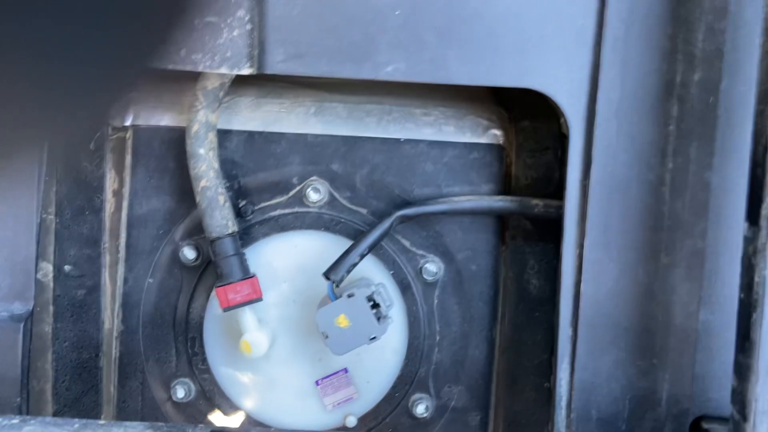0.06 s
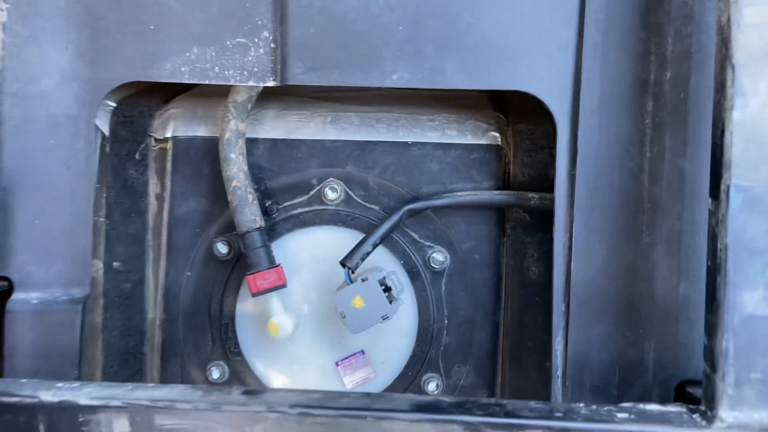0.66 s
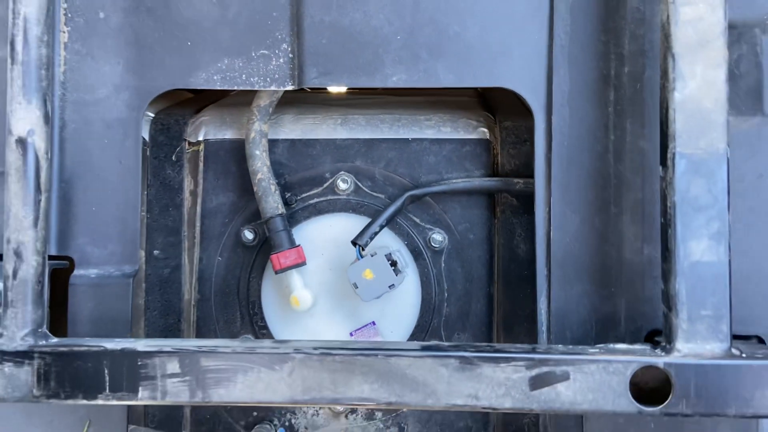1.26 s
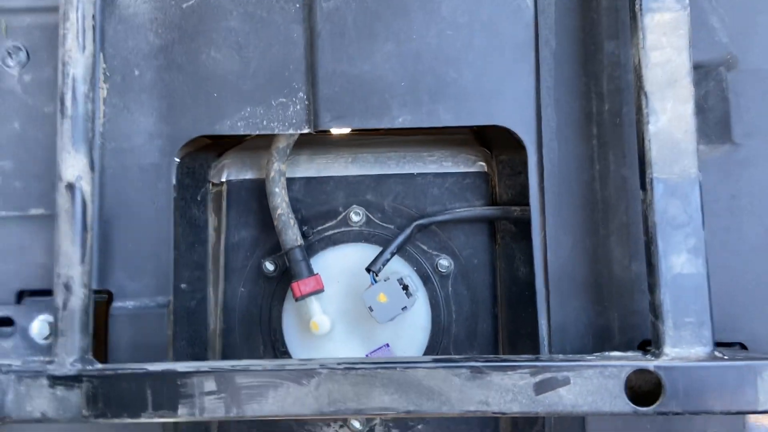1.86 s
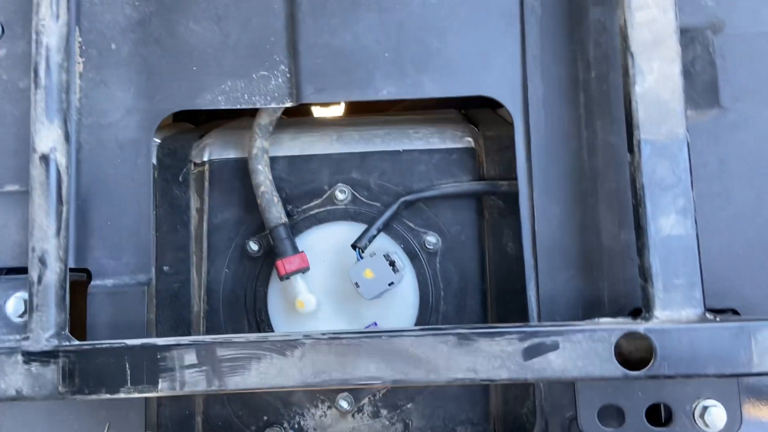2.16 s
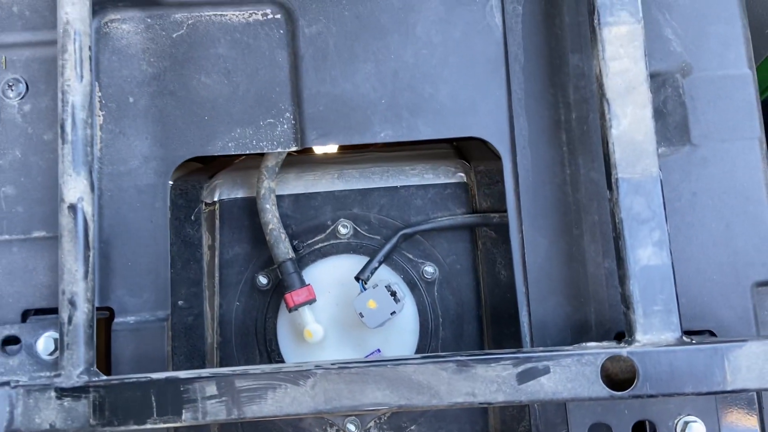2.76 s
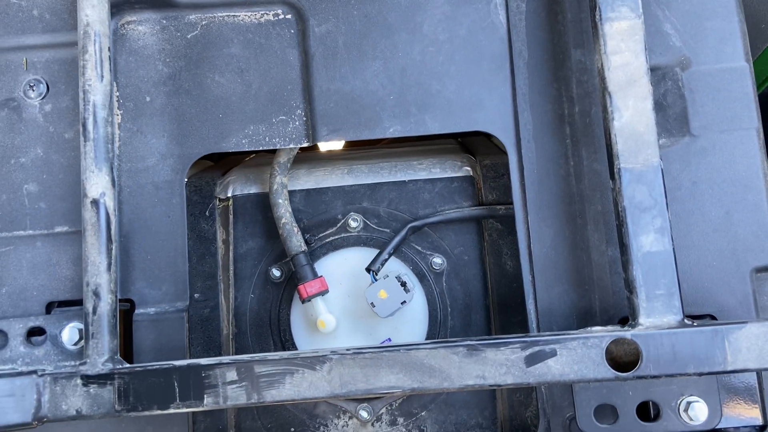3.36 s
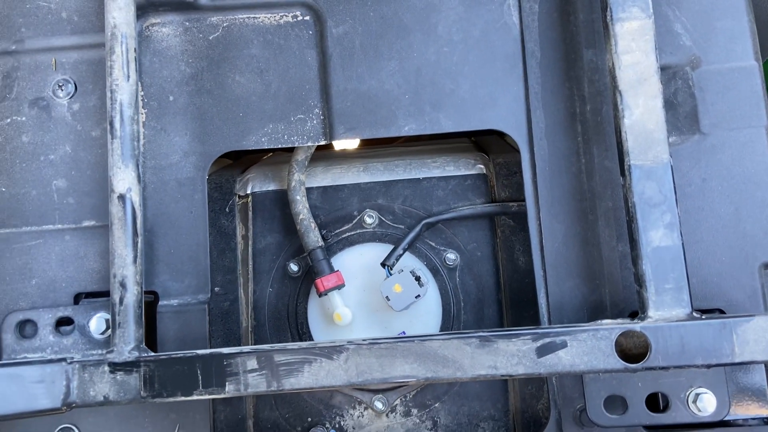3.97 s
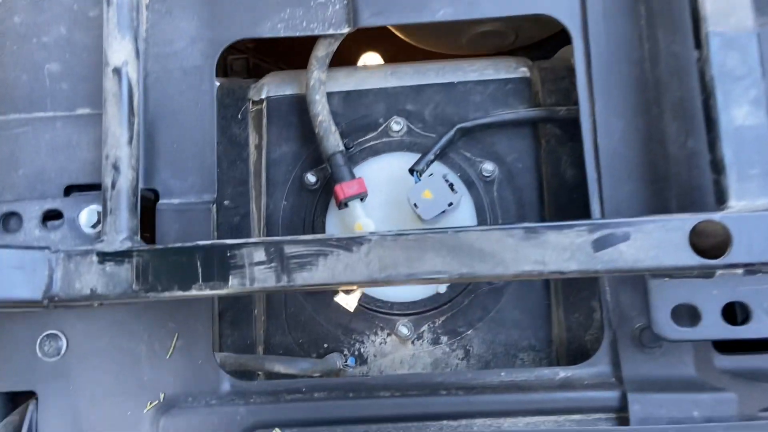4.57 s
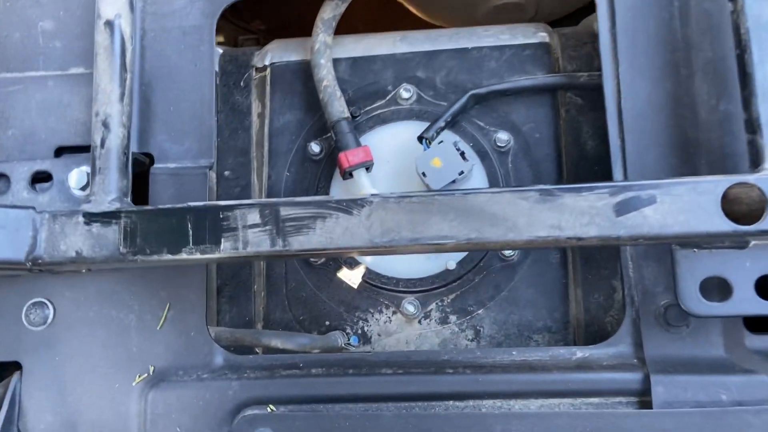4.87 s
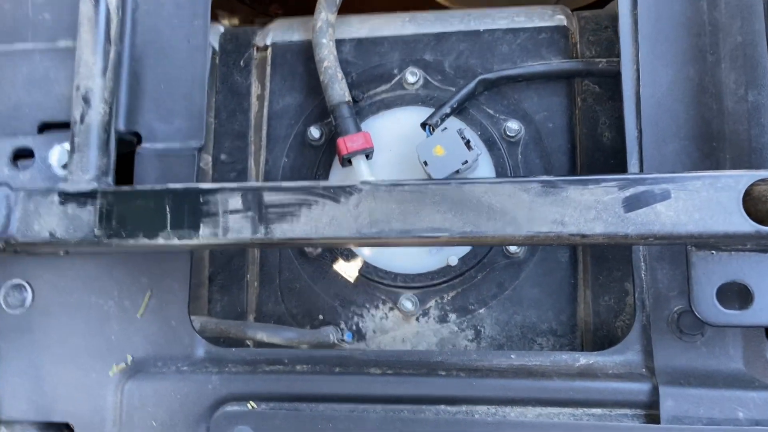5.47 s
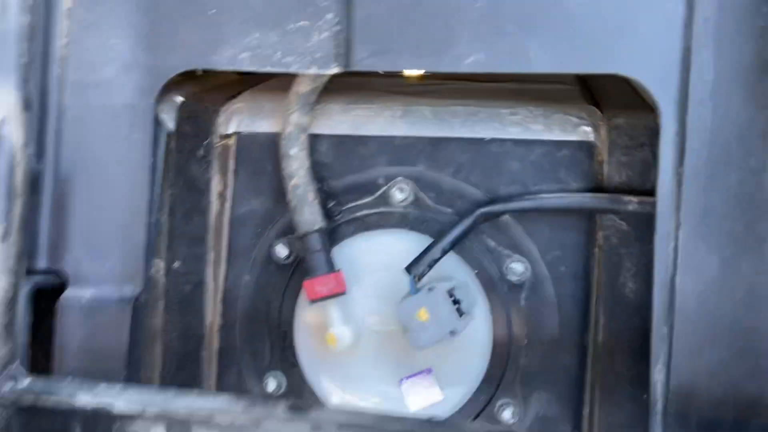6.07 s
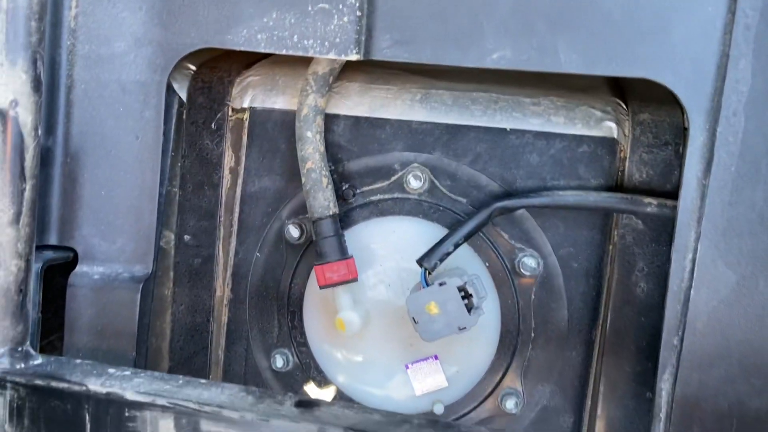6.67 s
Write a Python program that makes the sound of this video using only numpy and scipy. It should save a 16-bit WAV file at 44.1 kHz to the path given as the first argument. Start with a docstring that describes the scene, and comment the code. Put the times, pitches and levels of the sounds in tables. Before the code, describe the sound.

A twin-cylinder utility vehicle idles for the whole of nearly seven seconds, heard from just above the open hatch of its fuel tank. Deep, unevenly paired exhaust thumps dominate, with a quieter rasp of gas, a patter of valve ticks, ringing panels and a wavering mid-pitched hum. The speed hunts, sagging at about 0.6 seconds and again between 2.5 and 3.1 seconds; now and then a firing falters or a valve softly knocks. Loose metal fittings clink lightly three times between 0.6 and 1 second, then in a higher cluster from 2.6 to 3.3 seconds. A faint electric fuel pump whine grows from about 2 seconds, is strongest near 4.7, and swells again around 6.4. The hum rises briefly near 5.8 seconds. Resonances come and go as the microphone draws back through the middle and comes in again toward the end, the engine still running.

```python
"""A twin-cylinder utility vehicle idles, heard from just above the open hatch of its fuel tank.
From the start, each cycle gives two uneven thumps that boom in the silencer, a rasp of gas and a patter
of valve ticks; panels ring and a hum wavers near 490 Hz. Soon the speed hunts, a firing falters now and
then, and valves knock. Loose fittings clink, most near 3 s, as the electric fuel pump's whine grows.
Resonances come and go as the microphone draws back from the hatch and, toward the end, comes in again."""
import sys
import numpy as np
from scipy import signal
from scipy.io import wavfile
from scipy.ndimage import uniform_filter1d, minimum_filter1d

SR = 44100
rng = np.random.default_rng(int(sys.argv[2]) if len(sys.argv) > 2 else 0)


def put_to_file(sound):
    """Save the sound as 16-bit audio at rate SR, in the file named by the first command-line argument."""
    columns = np.atleast_2d(sound).T  # one column per channel
    safe = np.clip(columns, -1, 1)
    whole_steps = np.round(safe * 32767)
    wavfile.write(sys.argv[1], SR, whole_steps.astype(np.int16))


N = 296352
TIME = np.arange(N) / SR

# Stereo balance of the engine. Each row: frequency in Hz, left minus right in dB.
BALANCE = [(60, -2.5), (190, -4), (380, 7), (1250, -1), (2400, 4), (4400, 3.5), (8000, -0.5), (15000, 0)]
# Modes of the engine casing, each heard best from one spot. Each row: frequency in Hz, bandwidth in Hz,
# relative level there in dB, time of passing it in seconds, seconds to fall by 3 dB.
CASING_MODES = [(2847, 57, -47, 6.554, 0.8949), (3268, 105, -53.5, 4.998, -2.9),
                (3404, 49, -46.5, 1.51, 0.44), (3506, 63, -51, 2.7, -0.03), (3532, 55, -49.5, 6.5, 0.14),
                (3960, 66, -53.5, 0.25, 6), (4326, 79, -47, 1.5497, 0.62), (4175, 82, -50.5, 3.7, 0.47),
                (4404.4, 135, -48.5, 6.8, 1.5), (4737, 118, -52, 3.02, 2.15), (5567, 84, -53.5, 2.9, 1.22),
                (6156, 61, -55, 6.2, 4.2), (6461, 74, -54, 1.96, 2.5), (6614, 310, -53.5, 6.7, 2.25),
                (7253, 300, -53.5, 4, 6)]


def from_db(db):
    """Decibels to amplitude ratio."""
    return 10 ** (np.asarray(db) / 20)


def rms_one(x):
    """Scale to unit rms."""
    return x / np.sqrt(np.mean(x ** 2) + 1e-20)


def in_time(points, times=TIME):
    """Interpolate a curve linearly in time."""
    return np.interp(times, *np.transpose(points))


def at_hz(points, hz):
    """Interpolate a spectrum on a log-frequency axis."""
    frequencies, values = np.transpose(points)
    return np.interp(np.log(hz), np.log(frequencies), values)


def drift(corner_hz):
    """Low-passed noise: a slow random fluctuation of unit rms."""
    step, run_in = 40, 2000
    pole = np.exp(-2 * np.pi * corner_hz * step / SR)
    white = rng.standard_normal(N // step + run_in + 2)
    slow = signal.lfilter([1], [1, -2 * pole, pole * pole], white)[run_in:]
    return np.interp(np.arange(N) / step, np.arange(len(slow)), rms_one(slow))


def clicks(times, sizes, samples=N):
    """An impulse of the given size at each time."""
    at = np.round(np.maximum(times, 0) * SR).astype(int).ravel()
    return np.bincount(at, np.ravel(sizes), samples)[:samples] + 1e-18


def ring(x, hz, t60):
    """Free vibration: a unit impulse starts a damped sine of height 1."""
    r, w = from_db(-60 / (t60 * SR)), 2 * np.pi * hz / SR
    return signal.lfilter([0, np.sin(w)], [1, -2 * r * np.cos(w), r * r], x)


def fade(x, seconds):
    """Exponential decay: each impulse leaves a dying envelope of the same height."""
    return signal.lfilter([1], [1, -np.exp(-1 / (seconds * SR))], x)


def pan(x, pan_db):
    """A level difference, left minus right, places the sound."""
    return x * from_db([[pan_db / 2], [-pan_db / 2]])


def stereo(pair, hz, pan_db):
    """Partial coherence: two unrelated signals mix into left and right, most alike in the bass."""
    # Each row: frequency in Hz, left-right correlation.
    coherence = [(60, 0.986), (130, 0.954), (220, 1), (640, 0.6), (1400, 0), (2400, 0.668), (4500, 0.703),
                 (7000, 0.864), (9000, 0), (15000, 0.54)]
    alike = np.clip(at_hz(coherence, hz), -.99, .99)
    mid = np.sqrt((1 + alike) / 2) * pair[0]
    side = np.sqrt((1 - alike) / 2) * pair[1]
    return pan(np.array([mid + side, mid - side]), pan_db)


def shaken(envelope, hz, width_hz, pan_db):
    """Forced vibration: noise that follows the envelope drives one mode, scaled to about unit rms."""
    force = rng.standard_normal((2, N)) * envelope
    r, w = np.exp(-np.pi * width_hz / SR), 2 * np.pi * hz / SR
    motion = signal.lfilter(np.array([1, 0, -1]) * (1 - r * r) / 2, [1, -2 * r * np.cos(w), r * r], force)
    return stereo(rms_one(motion), hz, pan_db)


def chatter(envelope, per_s):
    """Shot noise: tiny random contacts, denser and harder where the envelope is high."""
    return (rng.random(N) < per_s * envelope / SR) * np.sqrt(envelope) + 1e-9


def swell(at_s, width_s):
    """Inverse-distance law as the microphone passes a spot: gain 1 there, 3 dB less one width away."""
    return 1 / np.sqrt(1 + ((TIME - at_s) / width_s) ** 2)


def crank(first_cycle_s=-0.02, second_share=0.265, pipe_delay_s=0.0049, scatter_db=0.3):
    """Four-stroke cycle: two turns give two unevenly spaced firings, the second delayed by its pipe."""
    # The crank sags and the governor picks it up. Each row: time in seconds, speed in rpm.
    idle_speed = [(0.0, 1263.0), (0.3, 1265.0), (0.5, 1197.0), (0.61, 1046.0), (0.72, 1254.0),
                  (1.13, 1298.0), (1.44, 1264.0), (1.82, 1360.0), (1.93, 1215.0), (2.2, 1292.0),
                  (2.39, 1310.0), (2.5, 1196.0), (2.7, 1082.0), (2.82, 1182.0), (3.0, 1163.0),
                  (3.12, 1013.0), (3.3, 1262.0), (3.67, 1358.0), (3.98, 1357.0), (4.08, 1190.0),
                  (4.16, 1316.0), (4.25, 1164.0), (4.36, 1261.0), (4.52, 1270.0), (4.66, 1209.0),
                  (4.95, 1335.0), (5.22, 1375.0), (5.38, 1300.0), (5.55, 1402.0), (5.71, 1344.0),
                  (5.81, 1244.0), (6.1, 1287.0), (6.2, 1386.0), (6.38, 1372.0), (6.48, 1220.0),
                  (6.7, 1442.0)]
    # The second cylinder carries the changing load and now and then burns badly.
    # Each row: time in seconds, strength against the first in dB.
    second_effort = [(0, 1.9), (.3, 2.1), (.42, .4), (.6, -.7), (.71, -5), (.8, 2.1), (.9, -.5), (1, 3),
                     (1.2, 2.7), (1.83, 1.2), (1.91, -4.6), (2.02, 1.9), (2.2, 2.3), (2.29, -2.7),
                     (2.38, 2.1), (2.48, -4.8), (2.6, .5), (3.1, .3), (3.4, 1.9), (3.65, 2.5), (4.04, -.3),
                     (4.22, -3.5), (4.45, 2.5), (4.72, .1), (4.9, 2.3), (5.9, 1.4), (6.25, 2.6),
                     (6.72, 2.1)]
    clock = first_cycle_s + TIME
    cycles = np.cumsum(in_time(idle_speed, clock)) / (120 * SR)
    start = np.interp(np.arange(int(cycles[-1]) + 1), cycles, clock)
    length = np.r_[np.diff(start), start[-1] - start[-2]]
    firings = np.c_[start, start + second_share * length + pipe_delay_s]
    db = np.c_[np.zeros(len(start)), in_time(second_effort, firings[:, 1])]
    strengths = from_db(db + scatter_db * rng.standard_normal(firings.shape))
    return start, length, firings, strengths


def exhaust(firings, strengths, gain_db=2):
    """Impulse response: firings kick the low modes of silencer and chassis, neighbours in antiphase."""
    # Each row: frequency in Hz, relative drive from the first and from the second cylinder in dB,
    # seconds to decay by 60 dB.
    boom_modes = [(48.97, 2.8, 1.55, .11), (55.48, 6.02, 5.81, .07), (90.96, -10.6, -5.7, .28),
                  (103.06, -31.7, -20.7, .4), (117.1, -38, -31, 1.0)]
    # One second of run-in, dropped at the end.
    first, second = (clicks(s + 1, size, N + SR) for s, size in zip(firings.T, strengths.T))
    boom = sum((-1) ** (k + 1) * ring(from_db(first_db) * first + from_db(second_db) * second, hz, t60)
               for k, (hz, first_db, second_db, t60) in enumerate(boom_modes))
    return from_db(gain_db) * boom[SR:]


def rasp(firings, lag_s=0.0084, decay_s=0.015, rise_s=0.001, second_db=-5, scatter_db=2.0):
    """Blowdown: the envelope of the gas that rushes out after each firing."""
    sizes = from_db(np.array([0, second_db]) + scatter_db * rng.standard_normal(firings.shape))
    return rms_one(fade(fade(clicks(firings + lag_s, sizes), decay_s), rise_s))


def ticks(start, length, decay_s=0.024, rise_s=0.002, scatter_db=1.06, slack_s=0.0021):
    """Periodic impacts: the envelope of the valve contacts, each a little loose in time and strength."""
    # Each row: position as a share of the cycle, relative level in dB.
    valve_contacts = [(0.152, -2), (0.206, 2), (0.58, 0.5), (.86, 4)]
    share, level_db = np.transpose(valve_contacts)
    late, loud = rng.standard_normal((len(start), 2, len(share))).swapaxes(0, 1)
    times = start[:, None] + length[:, None] * share + slack_s * late
    impacts = clicks(times, from_db(level_db + scatter_db * loud))
    return rms_one(fade(fade(impacts, decay_s), rise_s))


def rush(gas, valves, low_db, middle_db, treble_db):
    """Amplitude-modulated engine noise in third octaves: smooth below, pulsing with gas and valves above."""
    # Each row: frequency in Hz, relative spectral density in dB.
    spectrum = [(25, -11), (110, -48.5), (190, -56), (310, -61.5), (540, -68.5), (720, -64), (930, -69),
                (1230, -70.5), (1550, -65.5), (2150, -72), (4400, -78.5), (7500, -87.5), (11300, -82),
                (13500, -91.5)]
    gas_share, valve_share, pulsing_above_hz, flicker_db = 0.19735, 0.345, 1806.0, 2.412
    power_swing = gas_share * (gas ** 2 - 1) + valve_share * (valves ** 2 - 1)
    out, white = np.zeros((2, N)), rng.standard_normal((2, 2, N))
    edges_hz = np.geomspace(80, 17000, 24)
    for k, (low, high) in enumerate(zip(edges_hz, edges_hz[1:])):
        hz = np.sqrt(low * high)
        band = signal.sosfilt(signal.butter(2, [low, high], "band", fs=SR, output="sos"), white[k % 2])
        depth = hz ** 2 / (hz ** 2 + pulsing_above_hz ** 2)
        power = np.maximum(1 + depth * power_swing, 0)
        range_db = low_db if hz < 900 else middle_db if hz < 2600 else treble_db
        gain = from_db(at_hz(spectrum, hz) + range_db + flicker_db * drift(39.2))
        out += gain * np.sqrt(power * SR / 2) * stereo(band, hz, at_hz(BALANCE, hz))
    return out


def reflections(x, echo=0.506, above_hz=828.0, count=12):
    """Comb filtering: short echoes off frame and panels colour the treble, shifting with the microphone."""
    bright = signal.sosfilt(signal.butter(2, above_hz, "high", fs=SR, output="sos"), x)
    out = x.copy()
    for lag in (rng.uniform(.002, .022, count) * SR).astype(int):
        out[:, lag:] += echo / np.sqrt(count) * (drift(0.635) * bright)[:, :-lag]
    return out


def casing(gas, valves, gas_share=0.25):
    """Modal radiation: valve chatter and gas pulses ring the casing, each mode loudest from one spot."""
    blows = chatter(valves + gas_share * gas, per_s=1800)
    return sum(from_db(db) * swell(at_s, width_s) * shaken(blows, hz, width_hz, at_hz(BALANCE, hz))
               for hz, width_hz, db, at_s, width_s in CASING_MODES)


def panels(gas, low_db, middle_db, throb=0.046):
    """Structure-borne sound: engine vibration keeps the body panels ringing."""
    # Each row: frequency in Hz, bandwidth in Hz, relative level in dB, left minus right in dB.
    panel_modes = [(119.1, 6.9, -32.5, -3.5), (148.6, 42.6, -45, 6), (189.97, 2.7, -41.5, 6.5),
                   (211.84, 7.9, -46, 6.5), (261, 4.3, -45.5, -11.5), (457.64, 21, -39, 0.5),
                   (601.9, 21, -42.5, 1.5), (674, 140, -48, 10.5), (1466.6, 22.7, -45, 0.5),
                   (1698.4, 43, -43.5, 8)]
    out = np.zeros((2, N))
    for hz, width_hz, db, pan_db in panel_modes:
        range_db = low_db if hz < 900 else middle_db
        out += from_db(db + range_db) * shaken(1 + throb * gas, hz, width_hz, pan_db)
    return out


def hatch(gas, throb=0.4):
    """Resonance: buzzing contacts excite the opening's modes, which come and go as the microphone moves."""
    # Each row: frequency in Hz, bandwidth in Hz, level at the loudest spot in dB, time of passing it in
    # seconds, seconds to fall by 3 dB, left minus right in dB.
    hatch_modes = [(170.1, 21.7, -30.5, 6.45, 0.0055, 2.5), (261.2, 2.05, -40.5, 5.37, 0.1, 1.5),
                   (470.8, 44, -42, 1.792, 0.2, 2), (458.8, 33, -39.5, 3.58, 1.04, -1.5),
                   (654.7, 52, -40, 3.12, 0.56, -4.5), (692.1, 12, -40.5, 5.544, 0.21, -6.5),
                   (857, 80, -38.5, 5.12, 0.23, 1), (1471.7, 70, -36, 1.49, 0.29, -0.5),
                   (1452.8, 57, -38.5, 6.41, .5, -9), (1703, 82, -40.5, 1.73, 0.17, 8.5),
                   (1814.6, 49.4, -43, 2.1, -2.03, -1), (1869, 35, -42, 3.48, 0.26, 2.5),
                   (1680, 40, -40.5, 3.85, .5, 4), (1832.3, 59.3, -36.5, 4.59, 0.79, 3.5),
                   (2519.4, 47, -43.5, 3.67, 1.09, -1.5), (2778, 155, -43, 0.205, 0.56, 7),
                   (1985, 320, -39.5, 6.444, 0.06, 1), (2890, 104, -37, 6.35, 0.03, 4.5)]
    buzz = chatter(1 + throb * gas, per_s=1200)
    return sum(from_db(db) * swell(at_s, width_s) * shaken(buzz, hz, width_hz, pan_db)
               for hz, width_hz, db, at_s, width_s, pan_db in hatch_modes)


def quadrature(phase):
    """Two uncorrelated tones of unit rms, a quarter period apart."""
    return np.sqrt(2) * np.array([np.sin(phase), np.cos(phase)])


def wavering_hum(hz=493.3, flutter=0.00916, flicker_db=3, pan_db=3):
    """Random modulation: a hum near 490 Hz wavers a little in pitch and level."""
    # Each row: time in seconds, mean level in dB.
    hum_level = [(0, -43.5), (1.2, -41), (2.2, -39), (3.0, -41), (4.6, -40.5), (5.3, -40), (5.8, -35.5),
                 (6.2, -42), (6.72, -43.5)]
    phase = 2 * np.pi * np.cumsum(hz * (1 + flutter * drift(13.4))) / SR
    gain = from_db(in_time(hum_level) + flicker_db * drift(12.8))
    return gain * stereo(quadrature(phase), hz, pan_db)


def fuel_pump(gas, rotor_hz=97.7, wander=0.003026, flutter=0.006833, flicker_db=3.5, throb=0.62):
    """Rotor harmonics: the whine wavers with load and supply, and throbs as the engine shakes the tank."""
    # Each row: time in seconds, base level of the whine in dB.
    whine_level = [(0, -62.5), (1.8, -53.5), (3.3, -45), (3.9, -44), (4.7, -40.5), (5.3, -48), (5.9, -52.5),
                   (6.4, -43), (6.72, -45.5)]
    # Each row: multiple of the rotor frequency, relative level in dB.
    harmonics = [(5, -5), (10, -1.5), (12, -8.5)]
    speed_hz = rotor_hz * (1 + wander * drift(1.321) + flutter * drift(21.08))
    angle = 2 * np.pi * np.cumsum(speed_hz) / SR
    out = np.zeros((2, N))
    for order, db in harmonics:
        tone = quadrature(order * angle + rng.uniform(0, 2 * np.pi))
        gain = from_db(in_time(whine_level) + db + flicker_db * drift(7.4))
        out += gain * stereo(tone, order * rotor_hz, pan_db=4)
    return out * rms_one(1 + throb * gas)


def valve_knocks(t60_s=0.00415, gain_db=-14):
    """Impact excitation: a harder valve contact briefly rings all casing modes, each at random strength."""
    # Each row: start in seconds, relative level in dB.
    knocks = [(0.1, -28.5), (0.184, -23), (0.29, -22), (0.379, -27), (0.877, -24), (0.975, -25),
              (1.065, -26.5), (1.438, -28.5), (1.536, -22.5), (1.897, -27.5), (2.184, -20.5), (3.149, -27),
              (4.412, -21.5), (4.607, -23.5), (5.333, -24), (5.971, -29.5), (6.248, -25), (6.427, -28.5),
              (6.522, -26)]
    times, db = np.transpose(knocks)
    sizes = from_db(db + gain_db)[:, None] * rng.standard_normal((len(times), len(CASING_MODES)))
    struck = sum(ring(clicks(times, size), hz, t60_s) for size, (hz, *_) in zip(sizes.T, CASING_MODES))
    return pan(struck, pan_db=2)


def clinks(gain_db=-2):
    """Damped vibration: loose metal fittings touch and ring, most when the idle sags and the frame shakes."""
    # Each row: start in seconds, relative peak level in dB, frequency in Hz, seconds to decay by 60 dB.
    touches = [(0.578, -35.5, 2074, 0.041), (0.785, -28.5, 2094, 0.17), (0.968, -29.5, 2050, 0.085),
               (2.576, -31, 2520, 0.032), (2.634, -32, 2518, 0.0827), (2.696, -38.5, 2520, 0.0369),
               (2.781, -34, 2494, 0.066), (2.840, -31, 2543, 0.065), (2.941, -29, 2493, .1),
               (2.97, -28.5, 2520, 0.069), (3.107, -35, 2531, 0.061), (3.147, -27, 2526, 0.093),
               (3.312, -34, 2528, 0.043)]
    rung = sum(ring(clicks(s, from_db(db + gain_db)), hz, t60) for s, db, hz, t60 in touches)
    return pan(rung, pan_db=1.0)


def bass_limiter(x, below_hz=170, limit_db=-3, hold_s=.08):
    """Compression: the bass gain sinks as its peaks near the limit, evening out the thumps."""
    bass = signal.sosfiltfilt(signal.butter(4, below_hz, fs=SR, output="sos"), x)
    hold = int(hold_s * SR)
    held_peak = -minimum_filter1d(-abs(bass.mean(0)), hold)
    envelope = uniform_filter1d(held_peak, hold)
    gain = (1 + (envelope / from_db(limit_db)) ** 6) ** (-1 / 6)
    return x + (gain - 1) * bass


def scene():
    """Superposition: the crank drives thumps, rasp and ticks; the pump runs at its own speed."""
    # The microphone draws back and comes in again. Each row: time in seconds, relative midrange in dB.
    nearness = [(0, -27.5), (1.7, -30), (2.3, -32.5), (3.1, -33.5), (4.3, -32.5), (5.9, -29.5),
                (6.72, -29.5)]
    # Each row: time in seconds, treble gain in dB.
    treble_level = [(0, 0), (.55, -0.82), (1.6, -0.67), (2.3, -1.02), (3.1, -2.41), (3.6, -0.5), (4.4, -2),
                    (5.2, -0.01), (6.4, 0.01), (6.72, -0.5)]
    near_db, treble_db = in_time(nearness), in_time(treble_level)
    middle_db = near_db - near_db.mean()
    low_db = 0.387 * middle_db  # the low range follows only part of the swing
    start, length, firings, strengths = crank()
    gas, valves = rasp(firings), ticks(start, length)
    engine = exhaust(firings, strengths) + reflections(rush(gas, valves, low_db, middle_db, treble_db))
    metal = from_db(treble_db) * casing(gas, valves) + valve_knocks() + clinks()
    body = panels(gas, low_db, middle_db) + hatch(gas)
    return engine + metal + body + fuel_pump(gas) + wavering_hum()


def record(dry, low_cut_hz=34, ceiling=0.92, high_cut_hz=15800):
    """Band limiting and saturation: deep bass is lost, thumps are held, peaks rounded and the top cut."""
    thinned = signal.sosfilt(signal.butter(2, low_cut_hz, "high", fs=SR, output="sos"), dry)
    held = bass_limiter(thinned)
    rounded = held / (1 + (held / ceiling) ** 8) ** (1 / 8)
    return signal.sosfilt(signal.ellip(10, .1, 90, high_cut_hz, fs=SR, output="sos"), rounded)


dry = scene()
out = record(dry)
put_to_file(out)
```